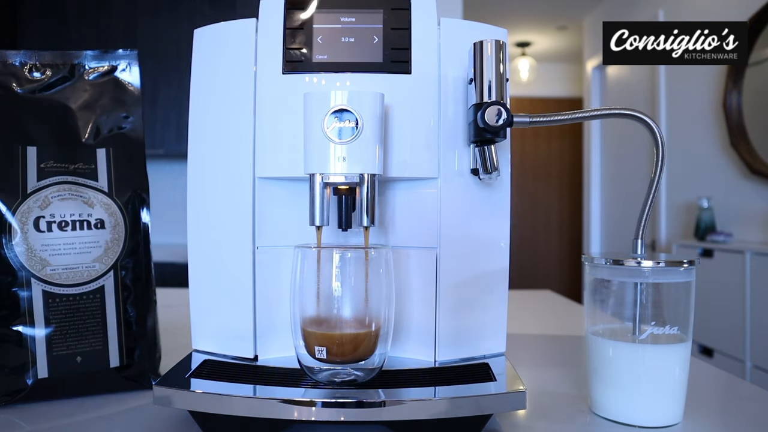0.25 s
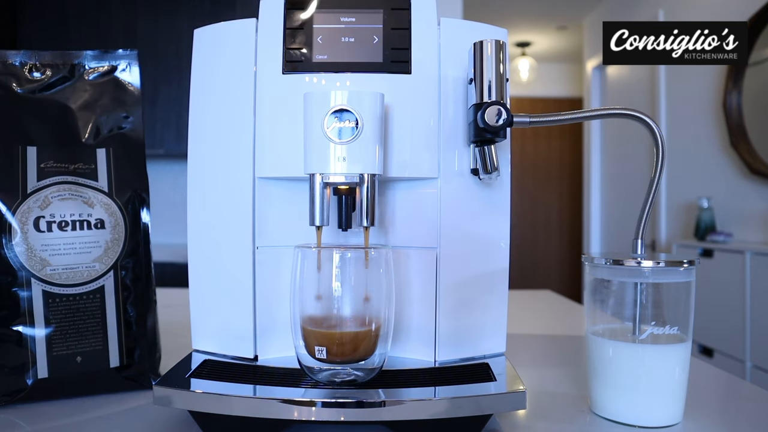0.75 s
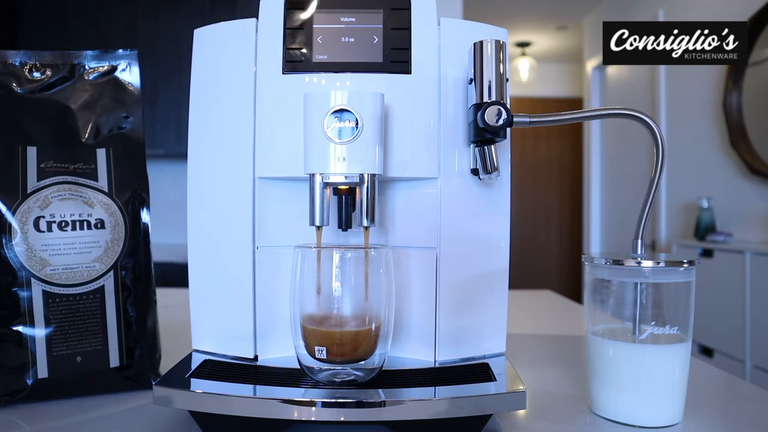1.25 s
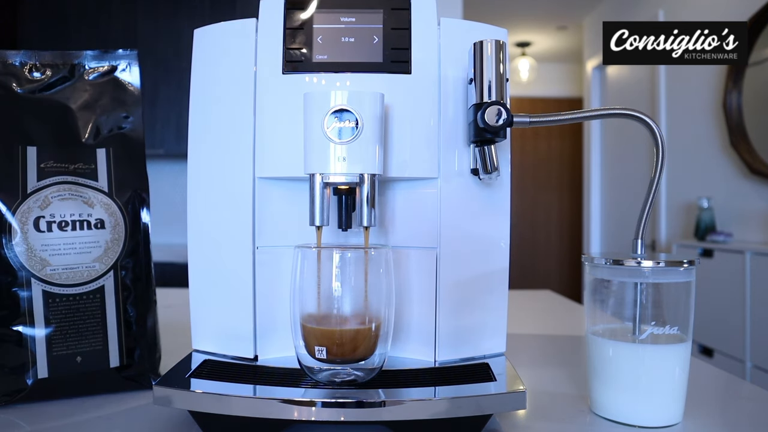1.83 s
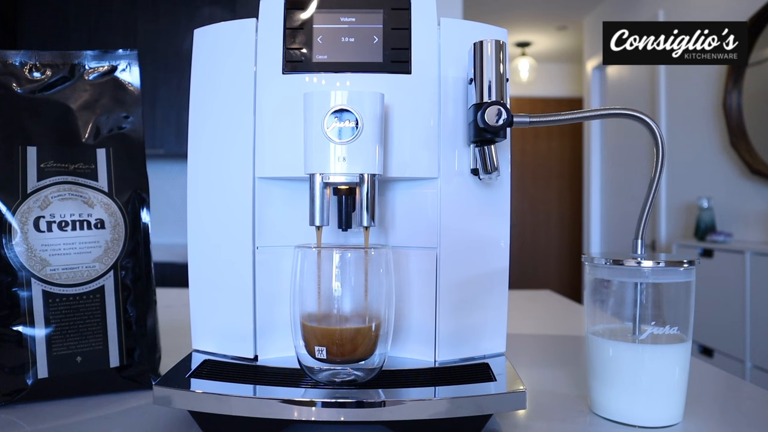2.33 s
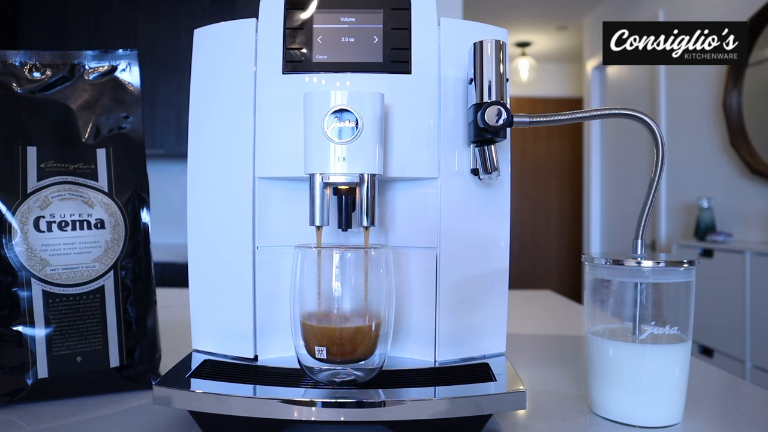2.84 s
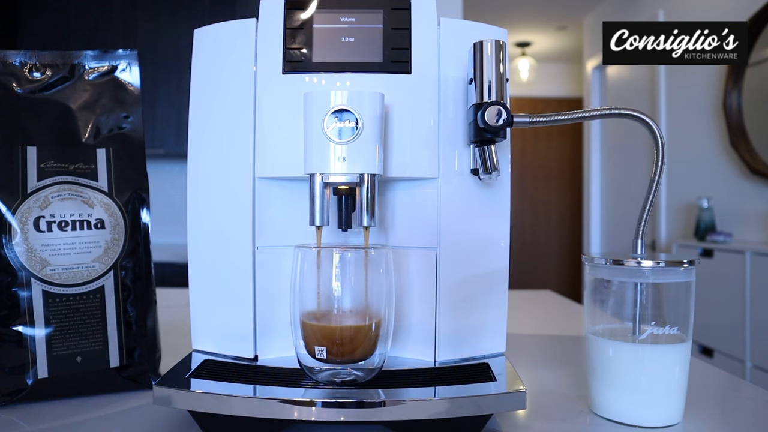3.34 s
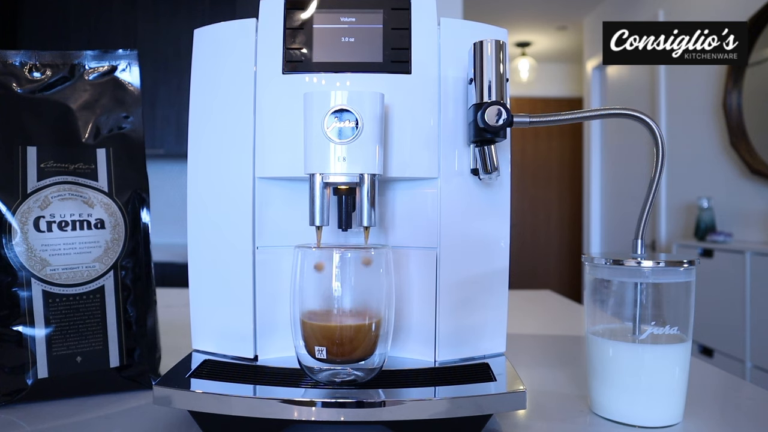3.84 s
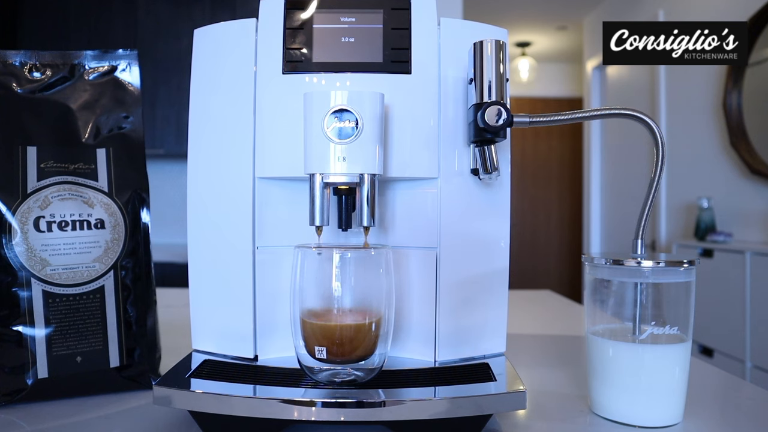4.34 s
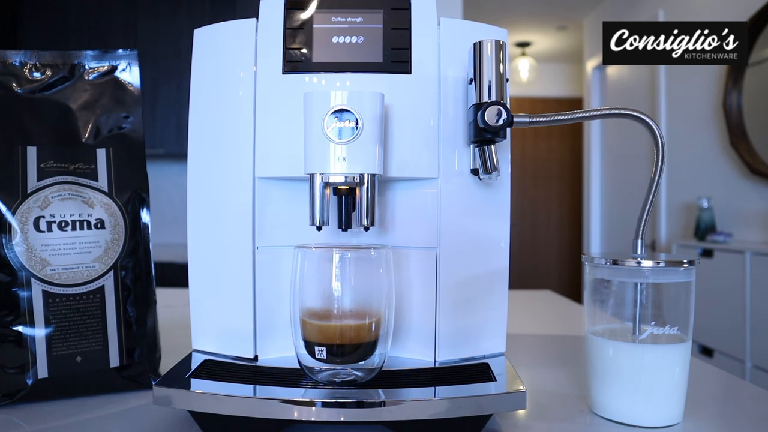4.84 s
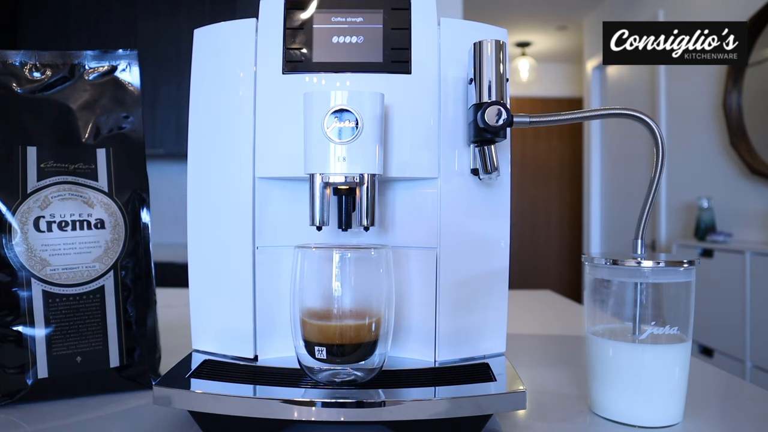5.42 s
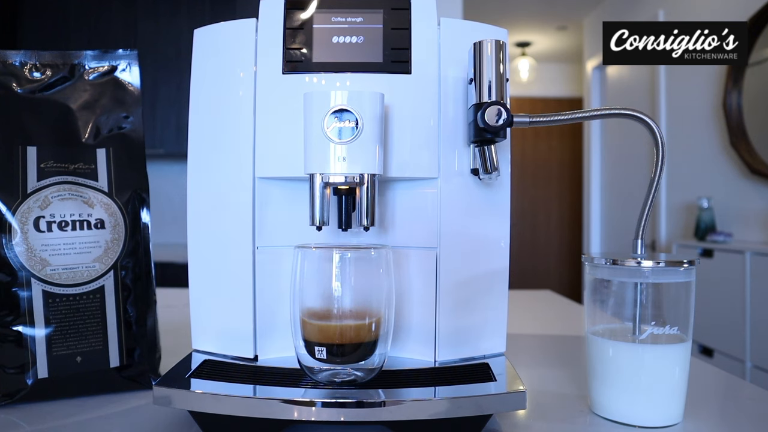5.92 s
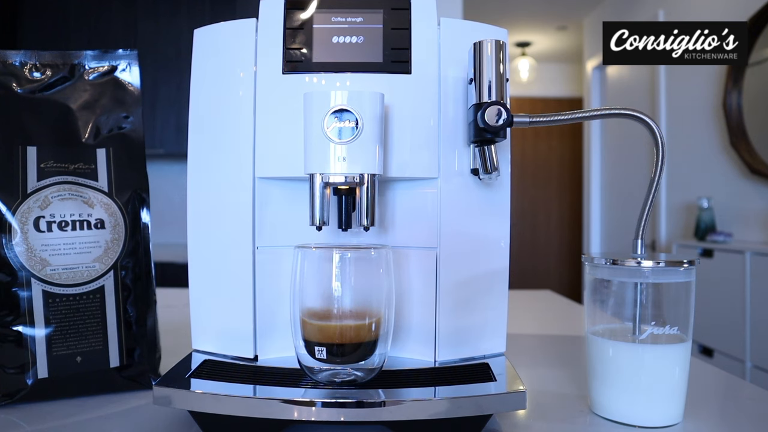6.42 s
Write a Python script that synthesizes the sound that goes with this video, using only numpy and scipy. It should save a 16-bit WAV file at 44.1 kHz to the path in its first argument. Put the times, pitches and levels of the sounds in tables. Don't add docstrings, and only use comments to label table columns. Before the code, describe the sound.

Close in a kitchen, a coffee machine's vibrating pump hammers in a fast, uneven buzz while coffee spatters and fizzes in a glass. It cuts off; plastic parts clack, water trickles and last drops tick. A sharp snap starts the grinder, which crunches beans loudly with motor hum, a high whistle and squealing gear to the end.

```python
import sys
import numpy as np
from scipy import signal
from scipy.fft import rfft, irfft, next_fast_len
from scipy.io import wavfile

SR = 44100
rng = np.random.default_rng(int(sys.argv[2]) if len(sys.argv) > 2 else 0)


def master_out(mix):
    frames = np.transpose(np.atleast_2d(mix))
    ceiling = np.clip(frames, -1, 1)
    pcm = np.round(ceiling * 32767).astype(np.int16)
    wavfile.write(sys.argv[1], SR, pcm)


def ratio(d):
    e = np.asarray(d, float) / 20
    return 10 ** e


N = 293706


def rms_one(x):
    return x / np.sqrt(np.mean(x ** 2) + 1e-20)


def white():
    return rng.standard_normal(N)


def in_time(rows):
    s, db = np.transpose(rows)
    return np.interp(np.arange(N) / SR, s, db)


def ramp(start, length):
    return np.clip((np.arange(N) / SR - start) / length, 0, 1)


def bumps(rows):
    t = np.arange(N) / SR
    return sum(height * np.exp(-((t - s) / length) ** 2) for s, height, length in rows)


def drift(rate):
    r = np.exp(-80 * np.pi * rate / SR)
    noise = rng.standard_normal(N // 40 + 2002)
    slow = signal.lfilter([1], [1, -2 * r, r * r], noise)[2000:]
    return np.interp(np.arange(N) / 40, np.arange(len(slow)), rms_one(slow))


def clicks(seconds, sizes):
    out = np.zeros(N)
    out[(np.asarray(seconds) * SR).astype(int)] = sizes
    return out


def ring(x, hz, t60):
    r, w = ratio(-60 / (t60 * SR)), 2 * np.pi * hz / SR
    return signal.lfilter([0, np.sin(w)], [1, -2 * r * np.cos(w), r * r], x + 1e-18)


def fade(x, t60):
    return signal.lfilter([1], [1, -ratio(-60 / (t60 * SR))], x + 1e-18)


def band(x, low_hz, high_hz):
    edges = [low_hz, min(high_hz, .45 * SR)]
    return signal.sosfilt(signal.butter(2, edges, "band", fs=SR, output="sos"), x)


def coloured(x, spectrum):
    hz, db = np.transpose(spectrum)
    grid = np.maximum(np.arange(N // 2 + 1) * SR / N, 1)
    return rms_one(irfft(rfft(x) * ratio(np.interp(np.log(grid), np.log(hz), db)), N))


def grains(per_s, spread_db):
    sizes = ratio(spread_db * np.minimum(rng.exponential(1, N), 4)) * rng.choice([-1, 1], N)
    return sizes * (rng.random(N) < per_s / SR)


def swell(start, hz, db, length, glide=0):
    t = np.arange(N) / SR - start
    shape = np.sin(np.pi * np.clip(t / length, 0, 1))
    return ratio(db) * shape * np.sin(2 * np.pi * (hz + glide * t / 2) * t)


MAINS_HZ, FIRST_STROKE_S = 60.0, .0098
STROKES, RUN_IN = 152, 15
SLIPS = (12, 62, 109)


def strokes():
    cycle = np.arange(-RUN_IN, STROKES)
    slipped = sum(cycle >= k for k in SLIPS)
    return FIRST_STROKE_S + cycle / MAINS_HZ, (cycle + slipped) % 3 != 1


# time in seconds, effort in dB.
EFFORT = [
    (0, 0),
    (.95, 0.1),
    (1.0, 3),
    (1.06, -0.4),
    (1.5, 0.9),
    (2.57, .8),
]
# pitch in Hz, level in dB, time to die away (60 dB) in seconds.
CASING = [(57, -15, 0.24), (94.5, -8, 0.23), (259.7, 2, 0.081), (295.7, -5.5, 0.19), (318.6, -9, 0.44),
          (344.2, -12.5, 0.7), (377, -6.5, 0.096), (457, -13.5, 0.2), (478, -11, 0.12), (520, -7.5, 0.21),
          (563.5, -4.5, 0.15), (592.3, -8.5, 0.18), (672, -14.5, 0.13), (736, -24.5, 0.35)]
# pitch in Hz, level in dB, time to die away in seconds.
MOUNT = [(160.8, 5, 0.37), (177.67, 6, 0.24)]
# pitch in Hz, level in dB, time to die away in seconds.
PISTON = [(1305, 0, 0.067), (1631, 12.5, 0.031), (1858, 1.5, 0.055), (2274, 4.5, 0.021), (2663, 0.5, 0.056)]
# frequency in Hz, level in dB per Hz.
RATTLE = [(150, 2), (500, -4), (1200, -16.5), (1640, -11), (2700, -18), (3870, -24), (4700, -24.5),
          (5300, -29), (6300, -25.5), (7400, -34), (8700, -33), (9800, -53), (12000, -38), (15500, -51)]


def pump():
    effort_db = in_time(EFFORT)
    stop_db = -15 * ramp(2.57, 0.031)
    thrust_db = -31.5 + effort_db + stop_db
    rattle_db = -37 + 1.4 * effort_db
    at, struck = strokes()
    lead = int(RUN_IN / MAINS_HZ * SR)
    at = at + lead / SR
    second = struck & np.roll(struck, 1)

    def chance():
        return rng.standard_normal(len(at))

    body = 0
    for k, (hz, db, t60) in enumerate(CASING):
        blow = clicks(at, struck * ratio(db + 0.33 * chance()))
        body = body + (-1) ** k * ring(blow, hz, t60)
    pull = np.maximum(at - .013, 0)
    rocking = 0
    for k, (hz, db, t60) in enumerate(MOUNT):
        rocking = rocking + (-1) ** k * ring(clicks(pull, struck * ratio(db)), hz, t60)
    body = body + band(rocking, 150, 206.0)

    return_s = .0078
    blow_at = at + .00004 * chance()
    back_at = at + return_s + 0.00045 * chance()
    metal = 0
    for hz, db, t60 in PISTON:
        blow = clicks(blow_at, struck * ratio(db - 2.0 * second + 1.0 * chance()))
        back = clicks(back_at, struck * ratio(db - 12.0 + 2.5 * chance()))
        metal = metal + ring(band(blow + back, 920, 2850), hz, t60)

    jolt = fade(clicks(at, struck * ratio(chance())), 0.068)
    rebound = fade(clicks(at + return_s, 0.81 * struck), 0.051)
    running = fade(clicks(at, 0.055), 0.3)
    rattle = band((jolt + rebound + running) * coloured(white(), RATTLE), 600, 17000)
    body, metal, rattle = (np.append(part[lead:], np.zeros(lead)) for part in (body, metal, rattle))
    return ratio(thrust_db) * body + ratio(rattle_db) * (ratio(-4.0) * metal + ratio(3.0) * rattle)


# frequency in Hz, level in dB per Hz.
ROOM = [(18, -32), (30, 3.5), (219, 1.5), (399, -5), (505, -1), (767, -14), (1200, -14), (1400, -16.5),
        (1970, -21.5), (3400, -21.5), (5310, -19.5), (8720, -21.5), (15500, -21.5)]
# time in seconds, level in dB.
TRICKLE = [
    (2.75, -53.5),
    (2.99, -61),
    (3.24, -64),
    (3.6, -51),
    (3.88, -55.5),
    (4.04, -53),
    (4.33, -58.5),
    (4.48, -57),
]


def air():
    low_db = in_time(TRICKLE)
    middle_db = -59.5 + 0.46 * (low_db + 56.5)
    hiss, murmur = coloured(white(), ROOM), coloured(white(), ROOM)
    tray = ratio(-8.5) * rms_one(ring(murmur, 342, 0.14))
    low = ratio(low_db) * (rms_one(band(murmur, 66, 610)) + tray)
    middle = ratio(middle_db) * rms_one(band(murmur, 850, 3700))
    return ratio(-56.5) * hiss + low + middle


# time in seconds, tick in dB, hollow sound of the glass in dB.
SPATTER = [(0.0952, -37, -39), (0.1456, -44, -52), (0.1974, -31, -34), (0.2748, -43.5, -36),
           (0.3747, -43, -40), (0.6065, -36, -33), (0.6275, -42, -44), (0.6488, -30.5, -26),
           (0.827, -39, -36), (0.847, -33, -30), (0.876, -35, -41), (1.0236, -27.5, -36),
           (1.0475, -27.5, -20), (1.2528, -34, -29), (1.314, -33, -30), (1.3616, -34, -23.5),
           (1.41, -52, -34), (1.497, -34, -30), (1.5716, -38, -40), (1.6087, -38, -45), (1.6588, -39, -32),
           (2.0413, -46, -42)]
# time in seconds, tick in dB, hollow sound of the glass in dB.
DROPS = [(3.165, -41, -42), (3.194, -53, -49), (3.386, -38, -42), (3.425, -40, -29.5), (3.433, -44, -32),
         (3.463, -42, -44), (3.48, -31, -28.5), (3.499, -48, -39), (3.547, -40, -42), (3.567, -35, -31.5),
         (3.582, -47, -56), (3.719, -37.5, -36), (3.736, -54, -38), (3.781, -43.5, -41), (3.801, -50, -41),
         (3.824, -47, -45), (3.842, -35, -46), (3.965, -44, -51), (4.04, -55, -45), (4.061, -45, -42),
         (4.086, -53, -48), (4.141, -44, -42.5), (4.162, -53, -47), (4.197, -49, -44), (4.244, -49, -46),
         (4.276, -40.5, -37), (4.325, -47, -51), (4.387, -55, -48), (4.421, -42, -40.5)]
# time in seconds, level in dB.
FOAM = [(0.1974, -50), (0.625, -46), (0.6479, -36), (0.8445, -38), (0.8754, -47), (0.9428, -42),
        (1.0246, -41), (1.057, -33), (1.5708, -45), (1.6631, -46), (2.0662, -50)]
# time in seconds, level in dB.
FLOW = [
    (0, -62),
    (2.5, -65),
    (3.0, -81),
    (3.4, -78),
    (4.4, -71),
    (4.5, -97),
]


def drops():
    s, tick_db, cavity_db = np.transpose(sorted(SPATTER + DROPS))
    tick = band(clicks(s, ratio(tick_db)), 1930, 4640)
    sharp = ratio(10.5) * ring(tick, 3200, 0.0019) + ratio(-5.0) * ring(tick, 3960, 0.01)
    cavity = band(clicks(s, ratio(cavity_db)), 400, 1170)
    hollow = ratio(0.5) * ring(cavity, 1190, 0.03) + ratio(3.5) * ring(cavity, 1110, 0.0034)

    spray_db = -53 + 0.63 * (tick_db + 40)
    foam_s, foam_db = np.transpose(FOAM)
    pops = clicks(s, ratio(spray_db + 1.5)) + clicks(foam_s, ratio(foam_db - 7.5))
    at, struck = strokes()
    first = struck & ~np.roll(struck, 1)
    spits = first * ratio(-51 - 3 * at + 2.5 * rng.standard_normal(len(at)))
    pops = pops + clicks(at[RUN_IN:] + .0045, spits[RUN_IN:])
    spray = fade(pops, 0.016) * rms_one(band(band(white(), 3800, 16700), 3800, 17000))

    fizz = ratio(in_time(FLOW)) * grains(120, spread_db=4)
    crackle = ratio(17.5) * ring(band(fizz, 2200, 4800), 3900, 0.0039) + ratio(-11) * ring(fizz, 1500, .03)
    bubble = swell(4.4745, hz=940, db=-35, length=.009)
    clack_swell = swell(3.656, hz=700, db=-35, length=.026, glide=-1500)
    return sharp + hollow + spray + crackle + bubble + clack_swell


def kitchen(x):
    size = next_fast_len(N + SR)
    w = 2 * np.pi * np.arange(size // 2 + 1) / size
    t60 = 0.47 / (1 + w * SR / (2 * np.pi * 6000))
    combs = 0
    for k, lag in enumerate((rng.uniform(.012, .04, 8) * SR).astype(int)):
        echo = ratio(-60 * lag / SR / t60) * np.exp(-1j * w * lag)
        combs = combs + (-1) ** k * echo / (1 - echo)
    return irfft(rfft(x, size) * combs, size)[:N]


# time in seconds, pitch in Hz, dull part in dB, bright part in dB,
# time to die away in seconds.
CLACKS = [(2.576, 575, -35.5, -42.5, 0.13), (2.603, 484, -32, -36, 0.15), (2.681, 500, -32, -37.5, 0.086),
          (2.727, 1060, -32, -32.5, 0.1), (2.824, 520, -32.5, -29.5, 0.11), (2.863, 496, -36, -32, 0.095),
          (2.907, 584, -40.5, -58, 0.12), (3.224, 270, -32, -46, 0.048), (3.435, 950, -26, -43, 0.025),
          (3.66, 640, -29.5, -46, 0.11), (3.929, 860, -30, -40.5, 0.085), (4.288, 1170, -31.5, -54, 0.033)]
# time in seconds, pitch in Hz, dull part in dB, bright part in dB,
# time to die away in seconds.
RELAY = [
    (4.495, 2260, -27.5, -30.5, 0.07),
    (4.505, 2270, -29, -56, 0.13),
    (4.524, 2300, -30, -37, 0.051),
]


def brew_unit():
    dull = rms_one(band(band(white(), 160, 1680), 150, 2040))
    bright_colour = [(1500, 0), (2500, 8.5), (6000, -1.0), (15500, -9.5), (16500, -62)]   # Hz, dB per Hz
    bright = rms_one(coloured(white(), bright_colour))
    rough = white()
    out = swell(2.82, hz=42, db=-49, length=.23)
    for s, hz, dull_db, bright_db, t60 in CLACKS + RELAY:
        hit = clicks([s], 0.49)
        burst = fade(hit, t60)
        knock = hit + .06 * burst * rough
        panel = ring(knock, hz, .03) + .7 * ring(knock, 1.14 * hz, .022)
        casing = ring(hit, 239.7, 0.17)
        out += ratio(dull_db + 2) * (0.79 * burst * dull + 0.8 * panel + 0.47 * casing)
        out += ratio(bright_db + 4.0) * fade(hit, 0.38 * t60) * bright
    return out


# pitch in Hz, level in dB.
WHINE_LINES = [(8700, 0), (9650, -4), (11800, -3)]


def whine():
    t = np.arange(N) / SR
    level_db = -71 + 45 * np.minimum(t - 4.03, 0)
    lines = sum(ratio(db) * rms_one(ring(white(), hz, .03)) for hz, db in WHINE_LINES)
    return ratio(level_db) * (1 - ramp(4.49, .02)) * lines


# frequency in Hz, level in dB per Hz.
BURRS = [(26, -69), (45, -74), (120, -4), (190, -2), (237, -7), (288, 2), (377, 6.5), (531, 3), (662, 5.5),
         (1000, -1.5), (2870, -7), (3320, -7.5), (3660, -11.5), (5970, -15.5), (15500, -39.5)]
# pitch in Hz, width in Hz, level in dB.
HOPPER = [(158, 6.4, 1), (400, 64, 1), (495, 40, -8.5), (655.5, 51, 5), (826.5, 10.7, 8), (1167, 44, 1),
          (1334, 67, -7), (2117, 77, 0.5), (2762, 27, -0.5), (3207, 124, -4), (4225, 98, -5.5),
          (4260, 100, -19), (5800, 260, -16.5), (5990, 140, -13), (6660, 140, -18.5), (8770, 170, -18),
          (8100, 150, -20.5), (11980, 94, -21.5), (12620, 150, -30)]
# time in seconds, change of load in dB, length in seconds.
BEANS = [(4.62, 1.2, 0.032), (4.755, -2.5, 0.03), (5.03, 3, 0.028), (5.62, -1.5, 0.086), (5.735, 3.5, 0.03),
         (5.78, -1.5, 0.037), (6.36, 0.3, .04), (6.415, -1, 0.016), (6.45, 4.5, 0.014), (6.485, 1, 0.014),
         (6.635, 1.7, 0.026)]


def crunch():
    cracks = rms_one(grains(9000 * ratio(2.7 * drift(25)), spread_db=2.5)) + 1.03 * white()
    hopper = 0
    for k, (hz, width, db) in enumerate(HOPPER):
        shaken = np.roll(cracks, 997 * (k + 1)) * ratio(2.1 * drift(9))
        hopper = hopper + ratio(db) * np.sqrt(width) * rms_one(ring(shaken, hz, 2.4 / width))
    mixed = coloured(cracks, BURRS) + ratio(-3.5) * rms_one(hopper)
    mixed = band(mixed, 125, 19000)
    load_db = bumps(BEANS)
    idle_db = -31 * (1 - ramp(4.527, 0.017))
    hz = np.arange(N // 2 + 1) * SR / N
    low = 1 / (1 + (hz / 1000) ** 4)
    top = 1 / (1 + (4000 / (hz + 1)) ** 6)
    out = 0
    for share, db, follows in ((low, -20, 1), (1 - low - top, -23.5, 0.48), (top, -32, 0.81)):
        part = rms_one(irfft(rfft(mixed) * share, N))
        out = out + ratio(db + follows * load_db + idle_db) * part
    return out


# pitch in Hz, level in dB.
MOTOR = [(120, -38.5), (240, -27.5)]


def hum():
    t = np.arange(N) / SR
    return sum(ratio(db + 1.5 + 1.4 * drift(39)) * np.sin(2 * np.pi * hz * t) for hz, db in MOTOR)


# time in seconds, peak level in dB.
SQUEAL = [(4.67, -34), (4.83, -28), (4.95, -19.5), (5.18, -25), (5.38, -14), (5.47, -19.5), (5.62, -22.5),
          (5.72, -15), (5.94, -16.5), (6.11, -17), (6.39, -26)]


def squeal():
    t = np.arange(N) / SR
    peaks_db = [np.maximum(db - 238 * abs(t - s), -48) for s, db in SQUEAL]
    return ratio(np.max(peaks_db, axis=0) - 7) * rms_one(ring(white(), 1735, .15))


# time in seconds, fall of the whistle in Hz, length in seconds.
SAGS = [
    (4.55, 79.5, 0.086),
    (4.76, 108.8, .04),
    (5.09, 169.6, .07),
    (5.31, 180.3, 0.051),
    (5.78, 170.3, .08),
    (6.56, 228, .08),
    (6.68, 275, 0.074),
]


def whistle():
    sag = bumps(SAGS)
    whistle_hz = 3410 - sag
    whistle_db = -31.5 + 0.039 * np.minimum(sag, 120)
    unsteady = 0.81 + 0.42 * drift(70)
    high = ratio(whistle_db) * unsteady * np.sin(2 * np.pi * np.cumsum(whistle_hz) / SR)
    shaft_db = -28 - 0.066 * sag + 3.0 * drift(8)
    shaft_hz = .2435 * whistle_hz + 8.0 * drift(6)
    return high + ratio(shaft_db) * np.sin(2 * np.pi * np.cumsum(shaft_hz) / SR)


def grinder():
    rumble = ratio(-53 + 2.7 * drift(5)) * rms_one(band(white(), 35, 75))
    turning = ramp(4.53, 0.022) * (hum() + squeal() + whistle() + rumble)
    groan = swell(6.45, hz=1460, db=-30, length=.21, glide=-420)
    return ramp(4.495, .003) * crunch() + turning + groan * (1 + 0.36 * drift(25))


def scene():
    near = pump() + drops() + brew_unit()
    return (near + ratio(-17) * kitchen(near) + grinder() + whine() + air())[None]


def band_limit(x):
    return signal.sosfilt(signal.butter(12, 15700, fs=SR, output="sos"), x)


def record(dry):
    return band_limit(dry)


dry = scene()
out = record(dry)
master_out(out)
```